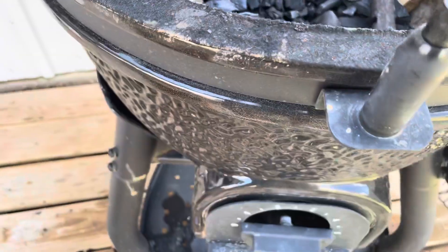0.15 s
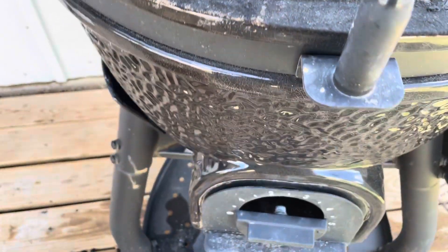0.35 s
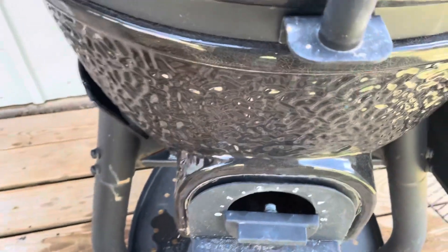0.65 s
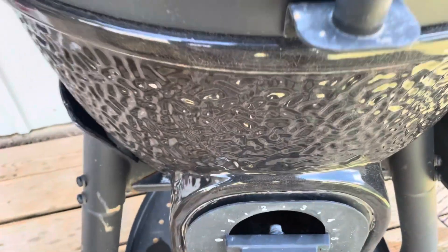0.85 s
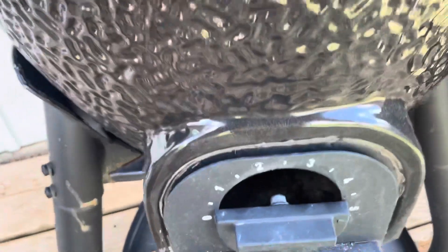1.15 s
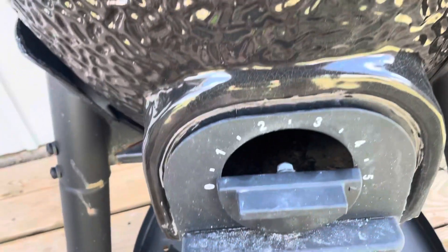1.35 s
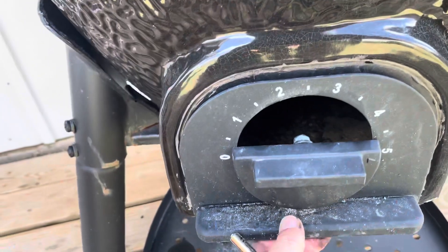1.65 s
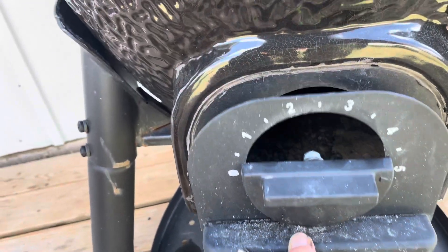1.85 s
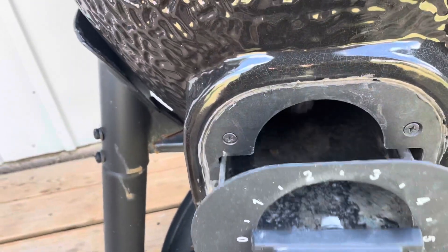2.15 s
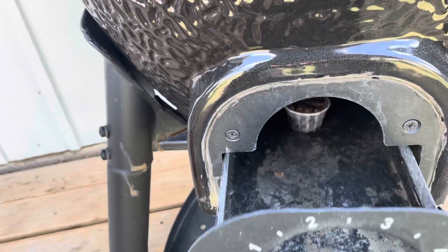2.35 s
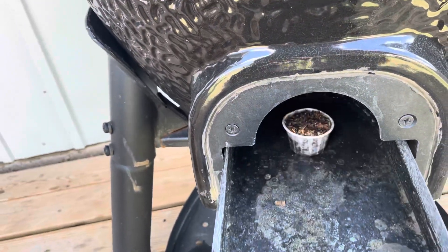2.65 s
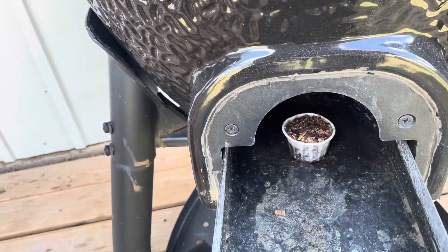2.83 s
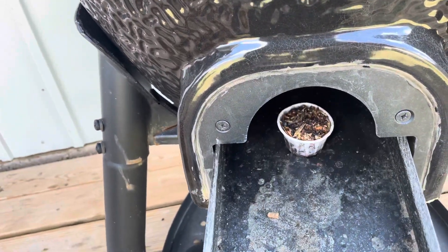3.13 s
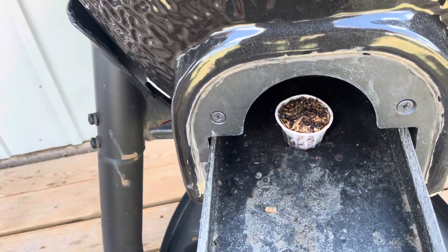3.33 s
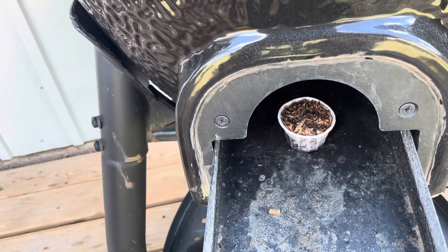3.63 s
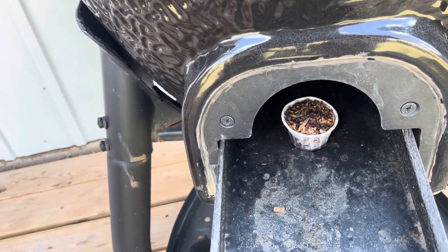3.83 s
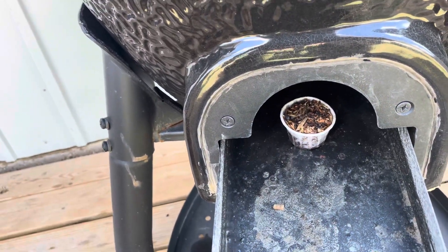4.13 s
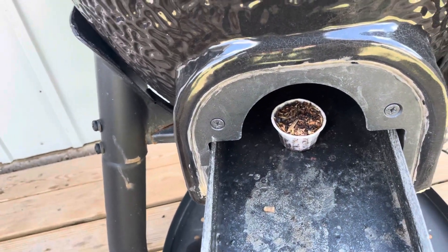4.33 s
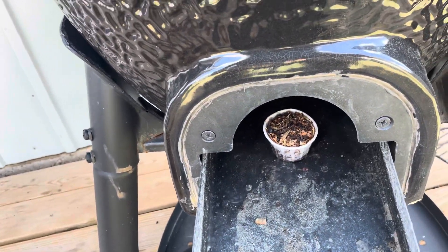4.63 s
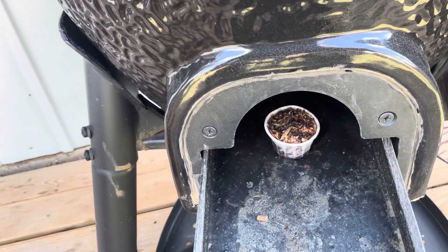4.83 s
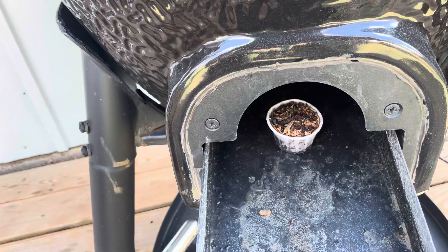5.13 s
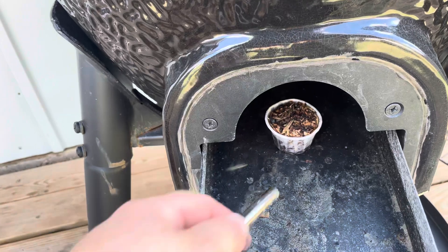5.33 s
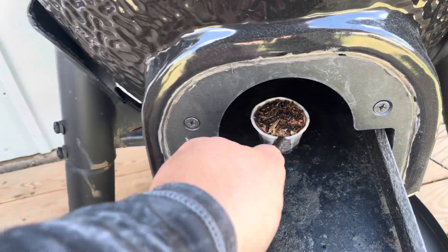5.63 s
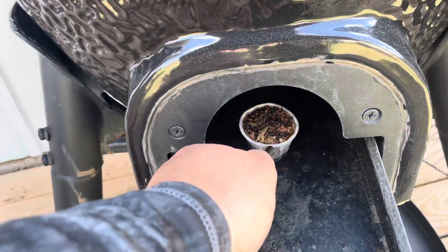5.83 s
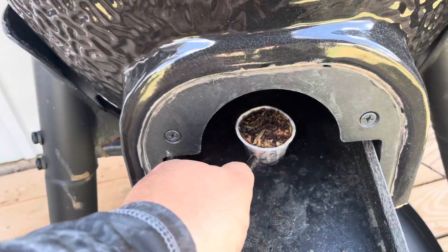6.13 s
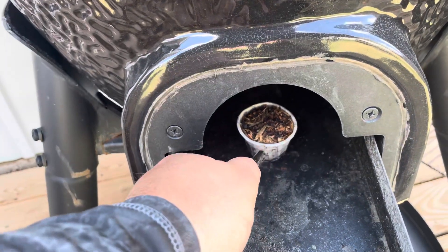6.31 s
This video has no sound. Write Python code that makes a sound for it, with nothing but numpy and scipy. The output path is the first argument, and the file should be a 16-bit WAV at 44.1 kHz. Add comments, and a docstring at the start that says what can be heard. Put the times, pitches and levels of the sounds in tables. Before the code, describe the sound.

Outdoors at a ceramic grill, a short scuff and a few light knocks come first. A sheet-steel ash drawer is dragged out over grit, clanking and ringing as it catches, then drops onto its stop. A sleeve rustles and fingers squeak faintly. A lighter clicks twice, the second much louder, and its gas jet lights with a soft hiss and hollow roar. The phone microphone is close, with a low yard hum behind.

```python
"""A short scrape, small knocks and a rustling sleeve, outdoors beside a ceramic grill. A sheet-steel ash
drawer is dragged out over grit, flexing and ringing as it catches, and drops on its stop. Fingers squeak,
a lighter's spring hammer clicks twice, and its gas jet lights and roars into the hollow under the grill.
A low hum fills the yard. Each source reaches a phone by two paths, which its ports mix to left and right."""
import sys
import numpy as np
from scipy import signal
from scipy.fft import rfft, irfft, next_fast_len
from scipy.io import wavfile
from scipy.ndimage import uniform_filter1d

SR = 44100
rng = np.random.default_rng(int(sys.argv[2]) if len(sys.argv) > 2 else 0)


def generate_wav(sig):
    """Save sig (samples, or channels by samples) to the path in sys.argv[1] as 16-bit PCM at SR."""
    pcm = np.round(np.clip(np.atleast_2d(sig).T, -1, 1) * 32767).astype(np.int16)
    wavfile.write(sys.argv[1], SR, pcm)


N = 285327
PULL_START, PULL_SAMPLES = 3 * SR // 2, 9 * SR // 4
PULL_END = PULL_START + PULL_SAMPLES
PULL_TIME_S = np.arange(PULL_START, PULL_END) / SR
HELD_BAND_HZ, FREE_BAND_HZ = (590, 3500), (69, 2430)  # drive on the tray: in its rails, hanging free

# Slide on the rails: (time [s], grit level [dB])
SLIDE_DB = [(1.68, -62), (1.72, -44.5), (1.785, -37), (1.91, -32.5), (2.03, -39), (2.1, -30), (2.2, -35.5),
            (2.42, -36), (2.58, -38.5), (2.72, -40.5), (2.88, -63)]
def drawer(stall_s=0.066, rub_db=-27.5):
    """Grit under the rails hisses, flexes the tray and rings it; catches and the final drop strike it."""
    gate, grit_db = (curve[PULL_START:PULL_END] for curve in played(SLIDE_DB))
    stalls_db = sum(db * hump(PULL_TIME_S, s, stall_s, 0.0033) for s, _, _, db, _, _ in TRAY_BLOWS)
    grit_db = grit_db + stalls_db
    rubbing = friction()
    flexing = flex(rubbing)
    judder_db = 2.45 * evened(uniform_filter1d(rng.standard_normal(PULL_SAMPLES), 400))
    rubbing = rubbing * amp(judder_db)
    rub_force = gate * amp(grit_db + rub_db) * bandpass(rubbing, HELD_BAND_HZ)
    blow_force, impacts = blows()
    slide = gate * (flexing + amp(grit_db) * grit(rubbing))
    return np.pad(tray(rub_force + blow_force) + slide + impacts, ((0, 0), (PULL_START, N - PULL_END)))


def friction(grains_per_s=2500):
    """Single grains crunch over a patchy hiss."""
    grain_db = 3.55 * np.minimum(rng.exponential(1, PULL_SAMPLES), 3.3)
    hits = rng.random(PULL_SAMPLES) < grains_per_s / SR
    grains = amp(grain_db) * hits * rng.standard_normal((2, PULL_SAMPLES))
    hiss = noise([(100, 0), (16000, 0)], 4.2, 0.76, span=(PULL_START, PULL_END))
    return evened(grains + 0.56 * hiss[:, PULL_START:PULL_END])


# Crack spectrum: (frequency [Hz], gain [dB])
CRACK_EQ = [(200, -32), (500, -13), (1000, -0.5), (1600, -5), (2500, -6.5), (3500, -5), (5400, -8.5),
            (6500, -10), (9000, -8), (12000, -13), (15500, -21)]
# Packed small modes: (frequency [Hz], gain [dB])
CLATTER_EQ = [(90, -23), (180, -5.5), (350, -10.5), (700, -9), (1100, -12.5), (2400, -22), (3200, -35.5),
              (6000, -54)]
# Catches, then the drop: (time [s], crack [dB], drive [dB], stall before [dB], clink [Hz], clink [dB])
TRAY_BLOWS = [(1.6962, -34, -71, 1, 1230, -42), (1.7397, -38, -45, -12, 1180, -36),
              (1.7975, -41, -50, -3.5, 2530, -39), (1.862, -24, -26, -4, 1700, -28),
              (1.9048, -30, -26, -0.5, 2660, -30.5), (1.97, -35, -26.5, -18, 1780, -29),
              (1.977, -47, -37, -2, 260, -26), (2.0117, -26, -19, 3.5, 3070, -28),
              (2.016, -37, -34, 1, 503, -19), (2.04, -44, -47, -1.5, 200, -25.5),
              (2.0828, -35.5, -25.5, 3.5, 3240, -28), (2.1342, -45, -32, -8, 3240, -40),
              (2.151, -15, -21, -9.5, 4760, -31.5), (2.1556, -27.5, -25, 4, 3130, -25),
              (2.1625, -34, -23, 3, 800, -22.5), (2.192, -34, -45, -12, 4350, -40),
              (2.2046, -31, -31, 1.5, 2290, -36), (2.2158, -29, -27, 4.5, 2330, -31),
              (2.248, -23.5, -26.5, -2, 4100, -29), (2.3237, -19, -28.5, 4, 6310, -21.5),
              (2.348, -33, -30, 0.5, 2510, -32), (2.349, -46, -50, 1, 199, -20),
              (2.3764, -26, -23, -2, 3240, -29), (2.402, -42, -28, -1.5, 540, -20),
              (2.412, -43, -33, 1, 290, -23), (2.4306, -30, -26.5, -4.5, 2310, -38),
              (2.444, -20, -27.5, 7, 2535, -19.5), (2.507, -34, -36, 3, 3330, -37),
              (2.5491, -20.5, -20.5, -0.5, 2560, -38), (2.62, -45, -45, -2.8, 1360, -29.5),
              (2.643, -46, -47, 0.5, 1360, -31), (2.6978, -44, -42, -0.5, 2340, -43),
              (2.727, -34, -61, 1, 2340, -37), (3.134, -45.5, -19, 0.1, 3230, -38)]
def blows():
    """Each blow pushes the tray and sounds a crack, clink and clatter. Returns force and sound."""
    force, cracks, clinks, clatter = np.zeros((4, 2, PULL_SAMPLES))
    tap = np.pad(np.hanning(12), (60, SR // 5 - 72))
    for s, crack_db, drive_db, _, clink_hz, clink_db in TRAY_BLOWS:
        held, at_s = s < SLIDE_DB[-1][0], s - PULL_START / SR
        add(cracks, at_s, amp(crack_db) * burst(0.033 if held else 0.2, rise_s=0.002))
        clink = ring(burst(0.017, rise_s=.0015), clink_hz, t60_s=0.036)
        add(clinks, at_s, amp(clink_db) * peaked(clink))
        scrape = burst(0.033, rise_s=0.0022)
        push = bandpass(.3 * tap + .31 * scrape, HELD_BAND_HZ) if held else (
            bandpass(tap + .08 * scrape, FREE_BAND_HZ))
        add(force, at_s, amp(drive_db - 14.5) * push)
        trim_db, t60_s = (-9, 0.29) if held else (-5.5, .17)
        add(clatter, at_s, amp(drive_db + trim_db) * burst(t60_s, rise_s=0.00077))
    cracks = coloured(cracks, CRACK_EQ) * cracks.std()
    clatter = coloured(clatter, CLATTER_EQ) * clatter.std()
    return force, clinks + cracks + clatter


# Steel modes: (frequency [Hz], gain held [dB], gain free [dB], t60 [s])
TRAY_MODES = [(175, -12, -5, 0.15), (235, -10, -8.5, 0.58), (255.5, -1, -0.5, 0.34), (308, -3, -18, 0.28),
              (335, -6, -11, 0.14), (426, -13.5, -11, 0.42), (510.3, -3.5, -6, 0.22),
              (550, -17, -11.5, 0.25), (594.7, -6.5, -10, 0.2), (649, 0.5, 4, 0.074),
              (710, -25, -1.5, 0.052), (722, -17.5, -21, .25), (763, -0.5, -2, 0.034), (805, -11, -15, 0.2),
              (878, -26, -18, 0.56), (954, -21, -7.5, 0.17), (997, -19, -15, 0.18), (1070, -30, -22, 0.099),
              (1227, -13.5, -14, 0.16), (1300, -25, -13, 0.19), (1337, -8, -16, 0.13),
              (1460, -16, -20, 0.29), (1577, -25, -22, 0.34), (1846, -7, -17, 0.087),
              (1970, -27, -24, 0.32), (2340, -11, -13, 0.11), (2528, -11.5, -14.5, 0.088),
              (3235, -9.5, -5.5, 0.12), (3380, -8.5, -6, 0.042), (3820, -11.5, -13, .1)]
def tray(force):
    """One set of modes, weighted as held in the rails until the drop, then as hanging free."""
    drop = round((TRAY_BLOWS[-1][0] - .01) * SR) - PULL_START
    held = free = 0
    for k, (hz, held_db, free_db, t60_s) in enumerate(TRAY_MODES):
        sign = (-1) ** k  # neighbours swing opposite ways
        held += sign * amp(held_db) * ring(force[:, :drop], hz, t60_s)
        free += sign * amp(free_db) * ring(force[:, drop:], hz, t60_s)
    return np.hstack([held, free])


# Jerks of the pull: (peak [s], low mode [dB], upper mode [dB], low [Hz], upper [Hz], 20 dB fade [s])
PULL_JERKS = [(1.73, -46.5, -69, 397, 610, 0.31), (1.79, -41, -53, 413, 576, 0.19),
              (1.87, -40, -32.5, 410, 580, 0.18), (1.94, -35, -42, 407, 630, 0.051),
              (2.024, -31, -30.5, 402, 488, 0.075), (2.08, -36, -56, 416, 494, 0.081),
              (2.157, -35, -38.5, 415, 687, 0.097), (2.21, -38, -31, 407, 579, 0.05),
              (2.247, -63, -45, 314, 545, 0.087), (2.281, -27, -23, 307, 483.6, 0.05),
              (2.352, -28.5, -30, 240, 556, 0.046), (2.382, -29, -29, 264, 532, 0.044),
              (2.412, -23, -20.5, 292, 506, 0.046), (2.446, -36, -29.5, 294, 618, 0.062),
              (2.478, -38, -37, 297, 550, 0.041), (2.52, -36, -48, 293, 656, 0.022),
              (2.561, -31.5, -28, 273, 472, 0.066), (2.609, -33, -51, 266, 500, 0.14),
              (2.68, -40.5, -44, 254, 524, 0.1), (2.73, -48.5, -54, 253, 508, 0.07)]
def flex(rubbing, swell_s=0.0342):
    """Each jerk flexes the tray and resets two pitches; the low one drops once the tray is half out."""
    peak_s, low_db, upper_db, low_hz, upper_hz, fade_s = np.transpose(PULL_JERKS)
    jerks = np.array([hump(PULL_TIME_S, s, swell_s, fade) for s, fade in zip(peak_s, fade_s)])
    latest = np.clip(np.searchsorted(peak_s - swell_s / 2, PULL_TIME_S) - 1, 0, None)
    low = steadied(resonance(rubbing, low_hz[latest], width_hz=33), 0.71)
    upper = steadied(resonance(rubbing, upper_hz[latest], width_hz=63), 0.71)
    return amp(low_db) @ jerks * low + amp(upper_db) @ jerks * upper


# Grit on steel: (frequency [Hz], gain [dB])
GRIT_EQ = [(90, -13), (180, -4), (330, 8.5), (480, 0), (700, -12.5), (1000, -4), (1600, -3), (2500, -4),
           (3500, -3), (5400, -8.5), (6500, -8), (9000, -14.5), (12000, -13), (15500, -24)]
def grit(rubbing):
    """Friction noise plus faint high modes, each waking only while the contact point suits it."""
    waking = amp(10.5 * np.clip(rng.standard_normal((30, 40)), -3, 1.4))
    spots = np.linspace(0, PULL_SAMPLES, 40)
    modes_hz = np.geomspace(900, 6000, 30) * rng.uniform(0.905, 1.047, 30)
    sheet = sum(ring(rubbing * np.interp(np.arange(PULL_SAMPLES), spots, gains), hz, 70 / hz)
                for gains, hz in zip(waking, modes_hz))
    return coloured(rubbing + 0.5 * evened(sheet), GRIT_EQ)


# Lighter body: (frequency [Hz], gain [dB], t60 [s])
LIGHTER_MODES = [(2340, -6.5, 0.013), (3710, -28, 0.05), (3630, -16, 0.086), (5070, -17, 0.008),
                 (6750, -1.5, 0.0052), (7750, -23.5, 0.073), (10870, -1.5, 0.011), (11800, -9.5, 0.015),
                 (1440, -23, 0.033), (1890, -19.5, 0.025), (14600, -28, .008)]
# Clicks: (time [s], snap peak [dB], rattle length [s], ring in snap [dB], thud [dB], casing knock [dB])
LIGHTER_CLICKS = [(5.6447, -25, 0.0036, -24, -67, -30), (5.8703, -1.5, 0.0066, -25.5, -21, -20)]
def lighter(bounce_s=.0019):
    """The spring hammer snaps, rattles for a few ms in the casing, then lands with a small thud."""
    mix, t = np.zeros((2, N)), np.arange(6000) / SR
    highpass = signal.butter(3, 2100, "high", fs=SR, output="sos")  # a small casing radiates no bass
    thud = np.sin(2 * np.pi * 380 * t) * amp(-60 * t / 0.014) * np.ones((2, 1))
    for s, snap_db, length_s, ring_db, thud_db, knock_db in LIGHTER_CLICKS:
        envelope = np.exp(-t / 0.014) * (1 - np.exp(-t / 0.000051))
        cutoff = np.clip((length_s - t) / 0.0016, .12, 1)
        bounces = 0.6 + np.exp(-(t % bounce_s) / 0.0013)
        first_strike = 1.15 * np.exp(-t / 0.00098)
        rattle = rng.standard_normal((2, len(t))) * envelope * cutoff * (bounces + first_strike)
        body = sum(amp(db) * ring(rattle, hz, t60_s) for hz, db, t60_s in LIGHTER_MODES)
        snap = amp(ring_db) * body + 0.42 * signal.sosfilt(highpass, rattle)
        casing = sum(ring(burst(0.023, rise_s=0.00067), hz, 0.006) for hz in (2210, 2360, 3310, 4900))
        add(mix, s, amp(snap_db) * peaked(snap))
        add(mix, s + length_s / 2, amp(knock_db) * peaked(casing))
        add(mix, s + length_s, amp(thud_db) * thud)
    return mix


# Flame spectrum: (frequency [Hz], gain [dB])
ROAR_EQ = [(120, -24), (200, -6), (350, 8), (544, -1), (700, 4.5), (950, -44), (1320, -9), (1700, -45),
           (2400, -31), (3500, -54)]
# Nozzle spectrum: (frequency [Hz], gain [dB])
NOZZLE_EQ = [(2000, 3), (3000, 3), (4000, -8), (4800, 2), (5600, -1), (6500, 6.5), (8000, -19),
             (10000, -21), (11500, 4.5), (13000, -2), (14500, 1), (15500, -6)]
# Hollow under the grill: (frequency [Hz], t60 [s], gain [dB])
FIREBOX_MODES = [(560, 0.14, 1.5), (623, 0.032, -23), (1320, 0.1, -8.5), (2330, .05, -22)]
# Flame licks: (time [s], boost [dB])
FLARES_DB = [(6.05, 2.5), (6.168, 8.5), (6.275, 8), (6.408, 5.5)]
# Gas opens, pops alight, burns: (time [s], roar [dB], hiss [dB])
JET_DB = [(5.72, -92, -80), (5.86, -78, -60), (5.885, -39.5, -50), (5.93, -70, -52), (5.97, -50.5, -52.5),
          (6.03, -46, -52), (6.47, -42, -51.5)]
def gas_jet(flare_s=0.029):
    """Gas hisses from the nozzle; once lit, the flame roars in the hollow under the grill."""
    span, t = (N - SR, N), np.arange(N) / SR
    gate, roar_db, hiss_db = played(JET_DB)
    roar_db = roar_db + sum(db * hump(t, s, 0.4 * flare_s, flare_s) for s, db in FLARES_DB)
    flame = noise([(100, 0), (4000, 0)], 1.8, 1.0, size=512, span=span)
    hollow = sum(amp(db) * ring(flame, hz, t60_s) for hz, t60_s, db in FIREBOX_MODES)
    roar = noise(ROAR_EQ, 1.0, 0.88, size=512, span=span) + 0.034 * hollow
    hiss = noise(NOZZLE_EQ, 2.2, 0.41, span=span)
    return gate * (amp(roar_db) * roar + amp(hiss_db) * hiss)


# Scrape spectrum: (frequency [Hz], gain [dB])
SCUFF_EQ = [(250, -17.5), (480, 1.5), (640, -13), (820, 3), (1130, -9.5), (1600, -6.5), (3500, -15),
            (6000, -15.5), (12000, -16), (15500, -31)]
# Opening scrape: (time [s], scrape [dB], thump [dB])
SCUFF_DB = [(0, -65, -62), (.008, -31, -49), (.02, -34, -33.5), (.03, -35.5, -30), (.042, -28.5, -34),
            (.058, -30, -25.5), (.068, -42, -46), (.078, -36, -53), (.085, -51, -50)]
def scuff():
    """A short coarse scrape with a thump under it."""
    gate, scrape_db, thump_db = played(SCUFF_DB)
    thump = steadied(evened(ring(rng.standard_normal((2, N)), hz=158.5, t60_s=0.27)), 0.57)
    scrape = noise(SCUFF_EQ, 1.0, 1.0, span=(0, SR // 8))
    return gate * (amp(scrape_db) * scrape + amp(thump_db) * thump)


# Hand and tool: (time [s], peak [dB], pitch [Hz], t60 [s], tick peak [dB], tick pitch [Hz])
HAND_KNOCKS = [(0.103, -32.5, 700, 0.021, -53, 1200), (.117, -50, 800, .012, -56, 1300),
               (.145, -41, 700, 0.029, -66, 1000), (0.204, -30, 500, 0.018, -43, 1220),
               (.282, -41, 600, 0.011, -49, 1800), (0.331, -36, 885, 0.058, -32, 1830),
               (.492, -41, 820, 0.022, -53, 1200), (.576, -58, 1470, 0.0069, -41.5, 3000),
               (0.63, -40.5, 750, 0.0094, -57, 1500), (.699, -42, 770, 0.015, -46, 2000),
               (.951, -33.5, 700, 0.016, -47, 1300), (0.996, -45, 2190, 0.0056, -56, 2960),
               (1.017, -38, 1650, 0.008, -44, 2200), (1.404, -42, 520, 0.012, -65, 1480),
               (1.471, -44.5, 654, 0.14, -46, 2860), (1.591, -41, 668, 0.16, -43, 1400),
               (3.038, -54, 1510, .01, -48, 4000), (3.439, -42, 870, 0.01, -71, 3000),
               (4.542, -43.5, 404, 0.029, -66, 900), (4.655, -49, 540, 0.025, -61, 990)]
def knocks():
    """Dry taps ring a damped mode and an overtone, with a higher tick on top."""
    mix = np.zeros((2, N))
    for s, db, hz, t60_s, tick_db, tick_hz in HAND_KNOCKS:
        push = burst(0.016 + 0.32 * t60_s, rise_s=0.0004)
        note = ring(push, hz, t60_s) + 0.64 * ring(push, 1.37 * hz, 0.0077)
        tick = ring(burst(0.042, rise_s=0.00063), tick_hz, 0.0028)
        add(mix, s, amp(db) * peaked(note) + amp(tick_db) * peaked(tick))
    return mix


# Cloth hiss: (frequency [Hz], gain [dB])
CLOTH_EQ = [(1500, -9.5), (4000, -2), (5500, 2.5), (6500, 5), (9000, -1), (12000, 2.5), (15500, -19)]
# Cloth swish: (frequency [Hz], gain [dB])
SWISH_EQ = [(900, -10), (1800, 1), (2500, 3.5), (2900, 2), (3300, 2), (4500, -1.5), (6000, -18)]
# Finest treble: (time [s], level re hiss [dB])
SHEEN_DB = [(0, -16), (.5, -7), (1.2, -10), (3.3, -16), (3.84, -10), (4.1, -6), (4.4, 0.5), (4.7, -11),
            (4.95, -6), (5.3, -12), (6.47, -11)]
# Sleeve and finger moves: (peak [s], hiss [dB], swish [dB], 20 dB swell [s], 20 dB fade [s])
SLEEVE_STROKES = [(.168, -60, -57, 0.11, 0.48), (.333, -55.5, -53.5, 0.0066, 0.1),
                  (.6, -63.5, -61, 0.089, 0.54), (.7, -62, -50.5, 0.093, 0.046),
                  (.805, -59, -62.5, 0.013, 0.092), (.975, -65, -53.5, 0.033, 0.33),
                  (1.05, -70.5, -80.5, 0.052, 0.51), (1.418, -67, -66, 0.035, 0.068),
                  (1.59, -64, -58, 0.11, 0.24), (2.984, -74.5, -70, 0.41, 0.23),
                  (3.042, -63, -61, 0.014, 0.028), (3.24, -64, -61.5, 0.36, 0.23),
                  (3.44, -63.5, -64.5, 0.056, 0.062), (3.7, -69.5, -66, 0.34, 0.065),
                  (3.84, -55.5, -62, 0.058, 0.14), (4.03, -61.5, -62.5, 0.043, 0.043),
                  (4.15, -71, -67, 0.12, 0.078), (4.33, -56, -62, 0.12, 0.15),
                  (4.4, -55.5, -64, 0.11, 0.027), (4.485, -63, -60, 0.075, 0.066),
                  (4.63, -60.5, -65, 0.066, 0.046), (4.72, -73, -62, 0.088, 0.2),
                  (4.91, -58.5, -63.5, 0.12, 0.062), (5.15, -60, -64.5, 0.13, 0.18),
                  (5.62, -70, -65.5, 0.099, 0.21)]
def rustle(rest_hiss_db=-82.5, rest_swish_db=-90):
    """Cloth slides on cloth, never quite still: a fine hiss and a lower swish."""
    hiss, swish = noise(CLOTH_EQ, .6, .6), noise(SWISH_EQ, 2.5, 1.)
    sheen = evened(signal.lfilter([1, -3, 3, -1], [1], hiss))
    hiss = hiss + amp(played(SHEEN_DB)[1]) * sheen
    t = np.arange(0, N + 64, 64) / SR
    strokes = np.array([hump(t, s, swell, fade) for s, _, _, swell, fade in SLEEVE_STROKES])
    _, hiss_db, swish_db, _, _ = np.transpose(SLEEVE_STROKES)
    level = lambda db, rest_db: np.interp(np.arange(N) / SR, t, amp(db) @ strokes + amp(rest_db))
    return level(hiss_db, rest_hiss_db) * hiss + level(swish_db, rest_swish_db) * swish


# Rubbing notes: (peak [s], level [dB], pitch [Hz], 20 dB swell and fade [s])
FINGER_SQUEAKS = [(3.85, -61, 3770, 0.13), (4.269, -55, 3070, 0.066), (4.359, -54, 2900, 0.14),
                  (4.411, -60, 2850, 0.046), (4.629, -52.5, 2960, 0.041), (5.15, -62.5, 2960, 0.17)]
def squeaks():
    """Fingers rub a smooth face: short swells of narrow-band noise."""
    mix, t = np.zeros((2, N)), np.arange(SR // 2) / SR
    for s, db, hz, ramp_s in FINGER_SQUEAKS:
        note = resonance(rng.standard_normal((2, len(t))), np.full(len(t), hz), width_hz=620)
        add(mix, s - .25, amp(db) * hump(t, .25, ramp_s, ramp_s) * note)
    return mix


# Hum bands: (centre [Hz], nominal width [Hz], gain [dB])
YARD_BANDS = [(74, 22.4, -12.5), (124.2, 10.6, -2), (174.7, 13, -10.5), (230.7, 13.7, -15.5),
              (274.7, 6.8, -20), (350.3, 7.3, -28), (443, 10.4, -25)]
# Hum envelope: (time [s], level [dB])
HUM_DB = [(0, -37), (.36, -47), (.97, -47.5), (1.33, -44.5), (1.65, -48), (2.05, -39.5), (2.5, -48),
          (3.15, -41.5), (4.23, -44), (5.0, -41.5), (5.75, -39.5), (6.47, -40)]
# Rumble spectrum: (frequency [Hz], gain [dB])
RUMBLE_EQ = [(20, -12), (40, -9), (70, 16), (100, 1), (150, 3.5), (200, -12), (300, -20.5), (500, -35),
             (900, -45)]
# Distant wash spectrum: (frequency [Hz], gain [dB])
WASH_EQ = [(150, -2), (300, 4.5), (500, -5), (800, 0), (1400, -8), (2200, -18), (4000, -28), (8000, -36.5),
           (16000, -45)]
# Distant wash envelope: (time [s], level [dB])
WASH_DB = [(0, -52.5), (.4, -55.5), (3.3, -55), (3.8, -58.5), (4.1, -57), (5.3, -57), (5.65, -52.5),
           (6.47, -56)]
def yard(rumble_db=-48.5):
    """A hum wavers in a few narrow bands over rumble and a distant wash."""
    shake, hum = rng.standard_normal((2, N)), 0
    for hz, width_hz, db in YARD_BANDS:
        t60_s = 1.5 / width_hz
        band = evened(ring(ring(shake, hz, t60_s), hz, t60_s))
        hum += amp(db) * steadied(band, 0.67, window=2000, floor=0.07)
    rumble = noise(RUMBLE_EQ, 0.34, 0.53, size=2048)
    wash = noise(WASH_EQ, 2.45, 0.21, size=512)
    return amp(played(HUM_DB)[1]) * hum + amp(rumble_db) * rumble + amp(played(WASH_DB)[1]) * wash


# Bands in the wash: (start [s], end [s], centre [Hz], width [Hz], level [dB])
DISTANT_BANDS = [(4.05, 5.05, 1374, 210, -65), (5.2, 7, 480, 27, -61), (5.2, 5.8, 960, 100, -65),
                 (3.9, 6.4, 830, 60, -67.5), (3.8, 5.2, 2600, 130, -71.5)]
def drifts():
    """Faint distant bands of noise fade in, hold and fade out."""
    mix = np.zeros((2, N))
    for start_s, end_s, hz, width_hz, db in DISTANT_BANDS:
        size = round((end_s - start_s) * SR)
        band = resonance(rng.standard_normal((2, size)), np.full(size, hz), width_hz)
        add(mix, start_s, amp(db) * signal.windows.tukey(size, .3) * band)
    return mix


def amp(db):
    return 10 ** (np.asarray(db) / 20)


def evened(x):
    return x / np.sqrt(np.mean(x ** 2) + 1e-20)


def peaked(x):
    return x / abs(x).max(axis=1, keepdims=True)


def steadied(x, share, window=600, floor=.05):
    """Divides out a share of a narrow band's wavering."""
    return x / (uniform_filter1d(x ** 2, window) + floor) ** (.5 * share)


def add(mix, s, sound):
    part = mix[:, round(s * SR):][:, :sound.shape[1]]
    part += sound[:, :part.shape[1]]


def read(points, hz):
    """Interpolates on a log-frequency axis."""
    points_hz, value = np.transpose(points)
    return np.interp(np.log(hz + 1), np.log(points_hz + 1), value)


def played(rows):
    """A gate open over the table's time span, then each column per sample."""
    s, *columns = np.transpose(rows)
    t = np.arange(N) / SR
    gate = uniform_filter1d(1. * (t >= s[0]) * (t <= s[-1]), 441)
    return gate, *(np.interp(t, s, column) for column in columns)


def hump(t, s, swell_s, fade_s):
    """Gain rising 20 dB per swell_s up to time s, then falling 20 dB per fade_s."""
    return amp(-20 * np.where(t < s, (s - t) / max(swell_s, .004), (t - s) / max(fade_s, .004)))


def burst(t60_s, rise_s):
    """A dying puff of noise on both paths."""
    t = np.arange(SR // 5) / SR
    return rng.standard_normal((2, len(t))) * amp(-60 * t / t60_s) * (1 - np.exp(-t / rise_s))


def noise(eq, patchy_db, flicker_db, size=256, span=(0, N)):
    """Shaped noise with drifting spectral patches and broadband flicker, silent outside the span."""
    length, hop, hz = span[1] - span[0], size // 4, np.fft.rfftfreq(size, 1 / SR)
    re1, im1, re2, im2, patches = rng.standard_normal((length // hop + 5, len(hz), 5), np.float32).T
    flicker = evened(uniform_filter1d(patches[0], 5))
    patches = evened(uniform_filter1d(uniform_filter1d(patches, 5, 0), 24, 1))
    gain = amp(read(eq, hz)[:, None] + patchy_db * patches + flicker_db * flicker)
    spectra = np.array([re1 + 1j * im1, re2 + 1j * im2]) * gain
    _, sound = signal.istft(spectra, nperseg=size, noverlap=size - hop)
    return np.pad(evened(sound[:, :length]), ((0, 0), (span[0], N - span[1])))


def coloured(x, eq):
    """Filters by a spectrum, to unit RMS."""
    size = next_fast_len(x.shape[1])
    gain = amp(read(eq, np.fft.rfftfreq(size, 1 / SR)))
    return evened(irfft(rfft(x, size) * gain, size)[:, :x.shape[1]])


def bandpass(x, band_hz):
    return signal.sosfilt(signal.butter(2, band_hz, "band", fs=SR, output="sos"), x)


def ring(x, hz, t60_s):
    """One damped mode; passes no deep bass."""
    r, w = 10 ** (-3 / (t60_s * SR)), 2 * np.pi * hz / SR
    return signal.lfilter([.5, 0, -.5], [1, -2 * r * np.cos(w), r * r], x)


def resonance(x, hz, width_hz):
    """Steep band following a pitch curve: shift to zero, smooth twice, shift back."""
    turn, r = np.exp(2j * np.pi * np.cumsum(hz) / SR), np.exp(-np.pi * width_hz / SR)
    return evened((turn * signal.lfilter([1], [1, -2 * r, r * r], x / turn)).real)


def nearby(x, share=0.2):
    """A close source: its second path carries a share of the first."""
    return np.array([x[0], share * x[0] + np.sqrt(1 - share ** 2) * x[1]])


def scene():
    """All sources, on two paths."""
    background = yard() + drifts()
    handling = rustle() + squeaks() + scuff()
    return background + handling + nearby(drawer() + knocks() + lighter()) + gas_jet()


# Port phase: (frequency [Hz], left lead [rad])
PORT_LEAD_RAD = [(0, 0), (250, -.3), (900, 1), (1500, .8), (1900, -1), (2800, 1.6), (3400, 2.4),
                 (3800, 1.3), (4700, .8), (5300, 2.9), (5600, 3.6), (6800, 5.8), (7400, 3.4), (8300, 3.14),
                 (9500, 3.14), (10500, 2.3), (12400, 0), (17000, 0)]
# Port likeness: (frequency [Hz], share of first path in right port [0-1])
PORT_COHERENCE = [(60, 0.95), (400, 0.79), (900, 0.037), (2000, 0.012), (5000, 0.35), (6300, 1),
                  (7200, 0.42), (8500, 1), (9600, 0.97), (10800, 0.019), (12000, 0.2), (12600, 1),
                  (17000, 1)]
# Port balance: (frequency [Hz], left minus right [dB])
PORT_TILT_DB = [(60, -4.5), (300, -3.5), (1000, -1), (3000, -2.5), (7000, -1), (16000, 1)]
def record(dry, cutoff_hz=16000):
    """Both ports hear the first path, offset in phase and level; the right also hears the second."""
    size = next_fast_len(N + 4096)
    hz = np.fft.rfftfreq(size, 1 / SR)
    first, second = rfft(dry, size)
    share = read(PORT_COHERENCE, hz)
    offset = np.exp(.5j * read(PORT_LEAD_RAD, hz)) * amp(.5 * read(PORT_TILT_DB, hz))
    left = first * offset
    right = (share * first + np.sqrt(1 - share ** 2) * second) / offset
    lowpass = signal.firwin(511, cutoff_hz, window=("kaiser", 9), fs=SR)
    return signal.oaconvolve(irfft([left, right], size)[:, :N], lowpass[None], "same")


dry = scene()
out = record(dry)
generate_wav(out)
```